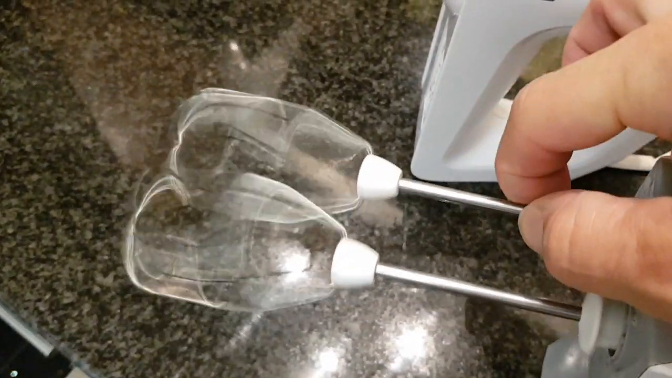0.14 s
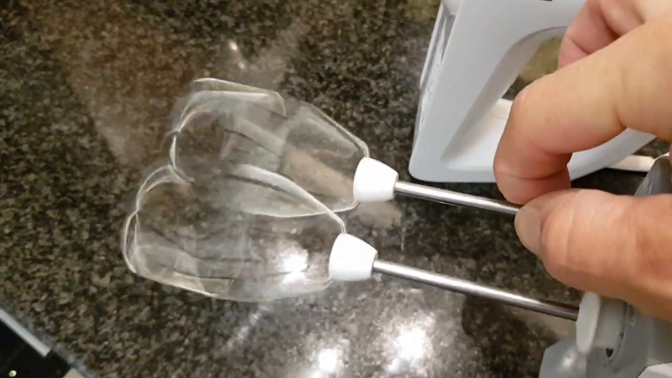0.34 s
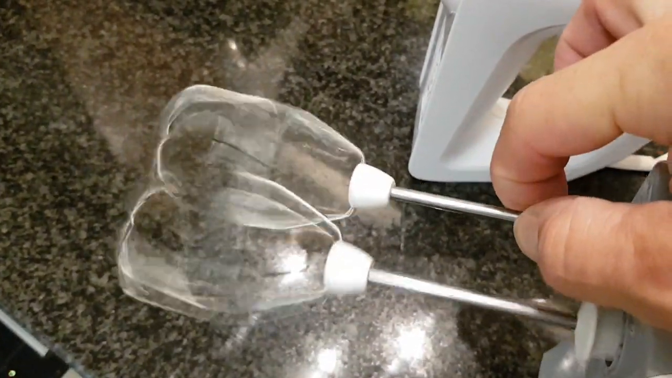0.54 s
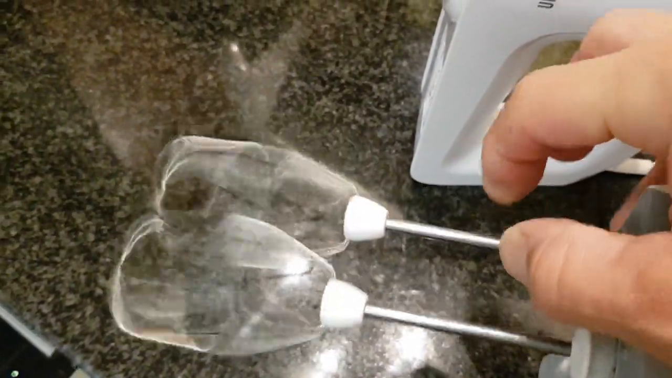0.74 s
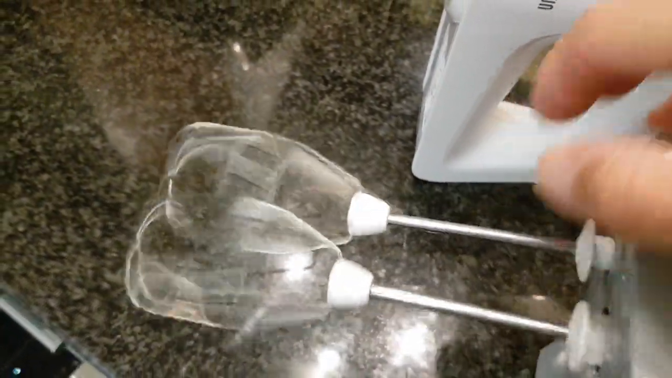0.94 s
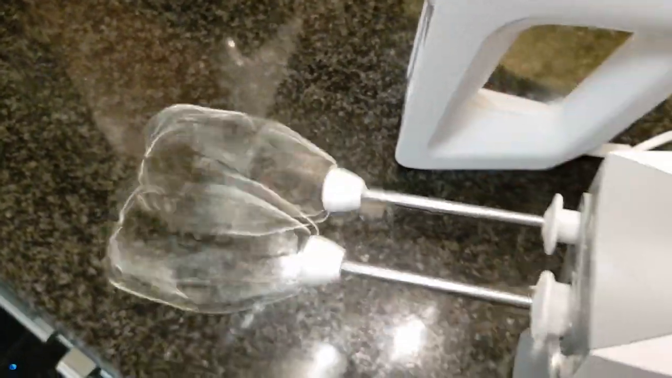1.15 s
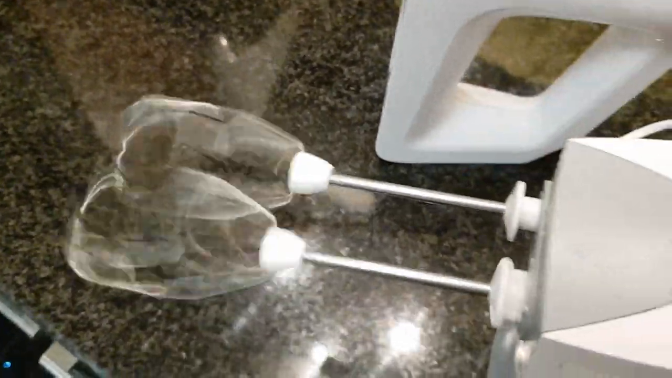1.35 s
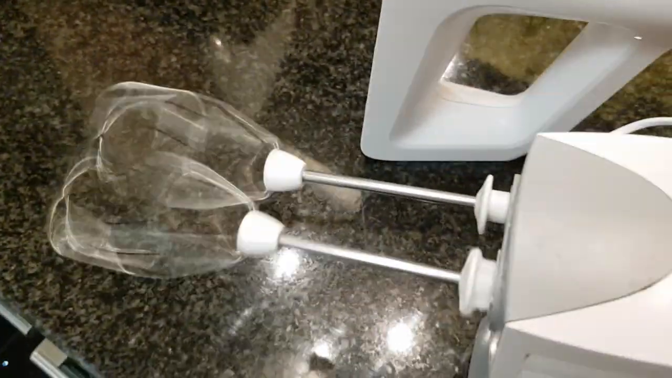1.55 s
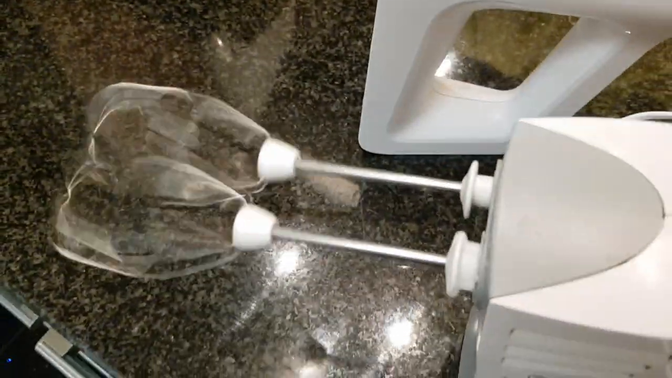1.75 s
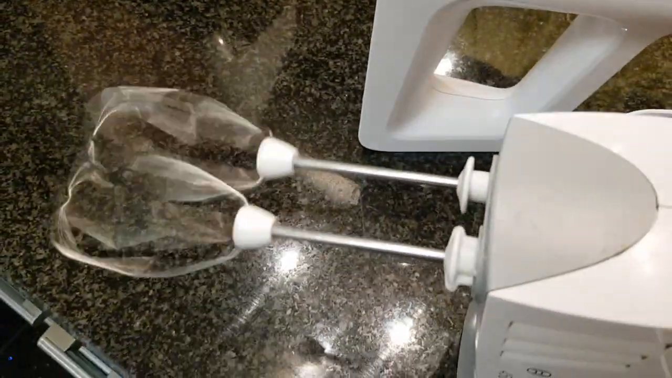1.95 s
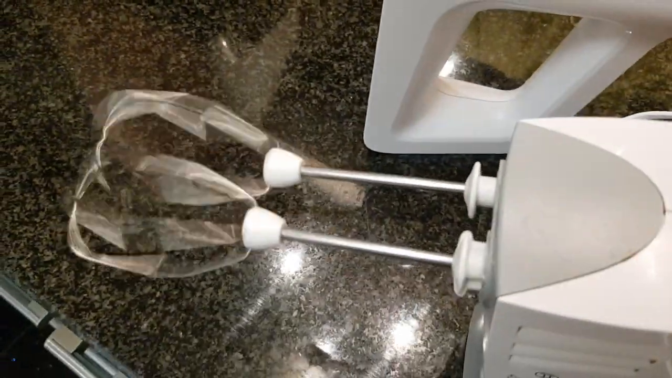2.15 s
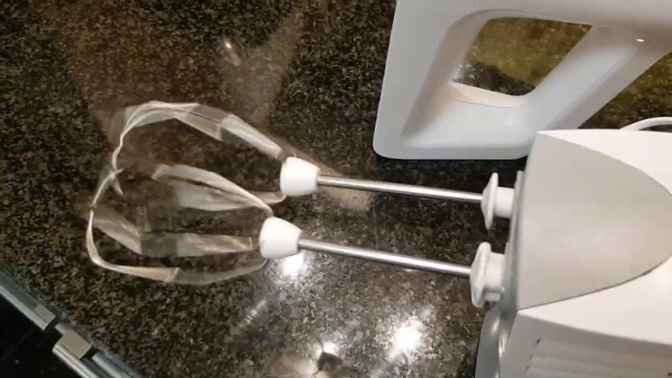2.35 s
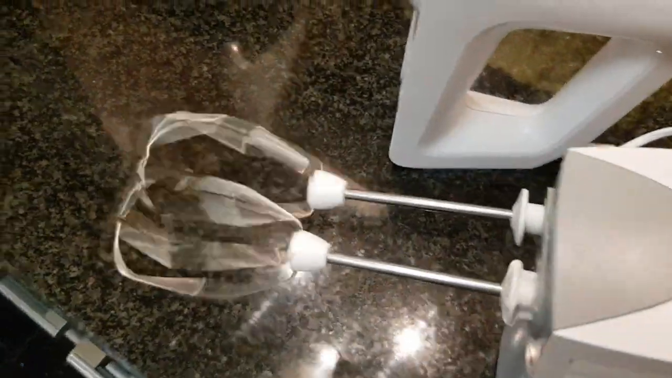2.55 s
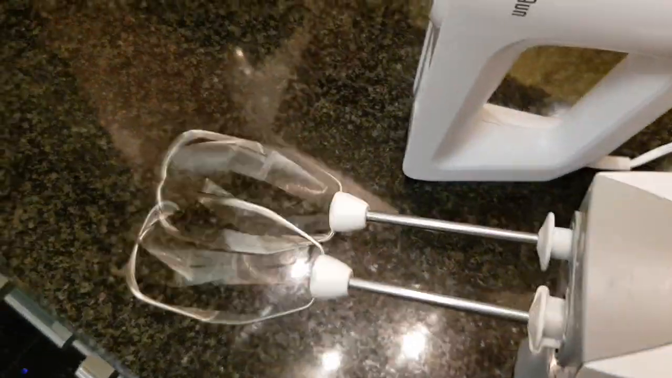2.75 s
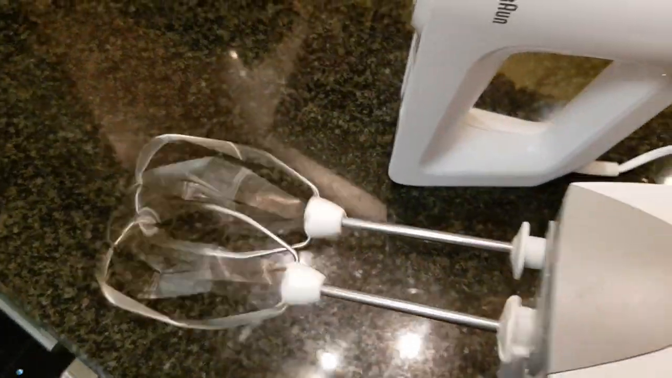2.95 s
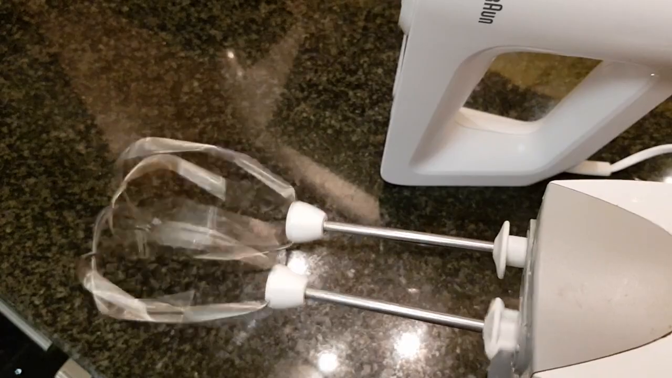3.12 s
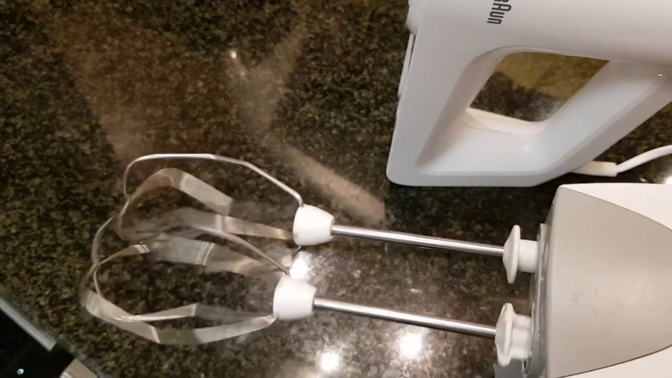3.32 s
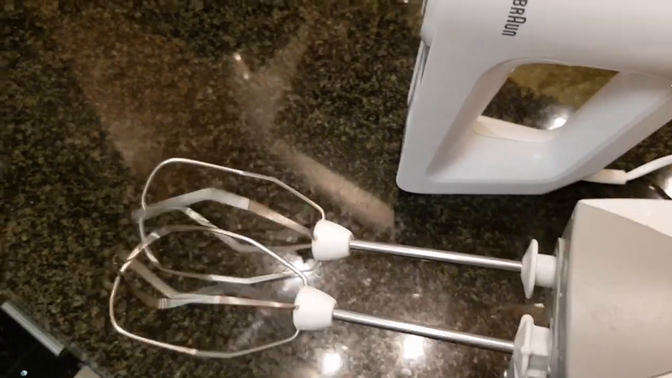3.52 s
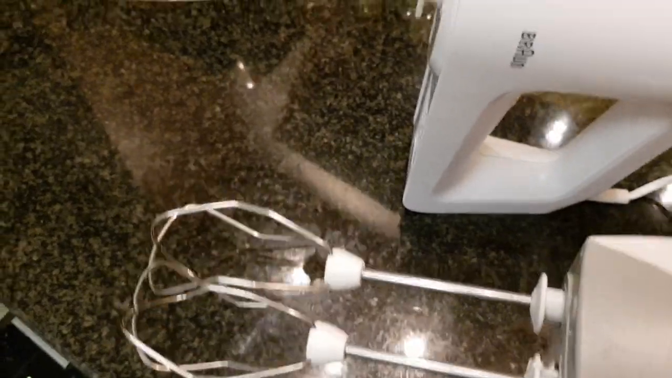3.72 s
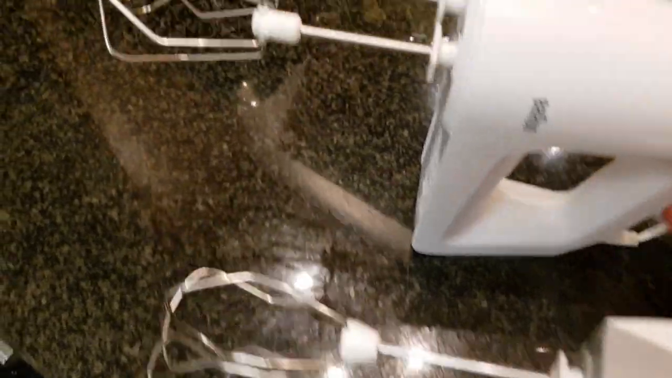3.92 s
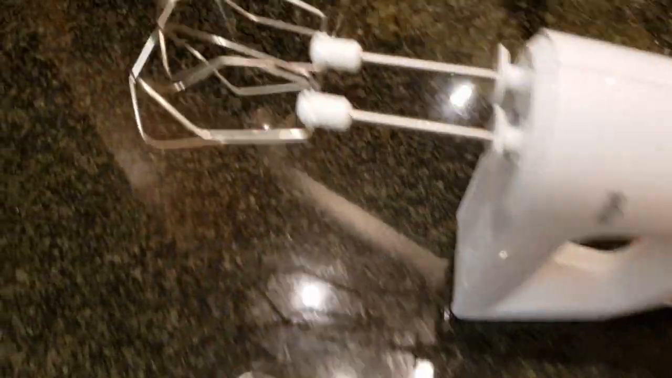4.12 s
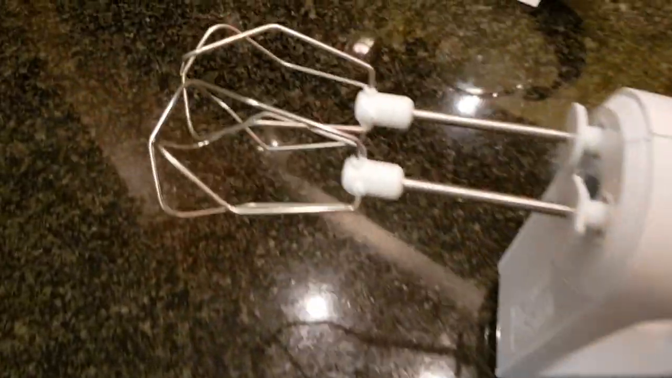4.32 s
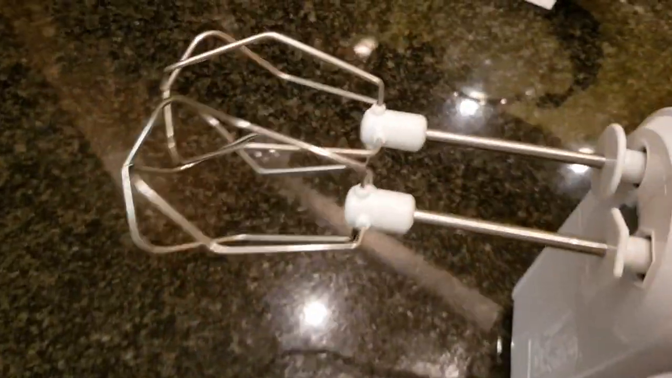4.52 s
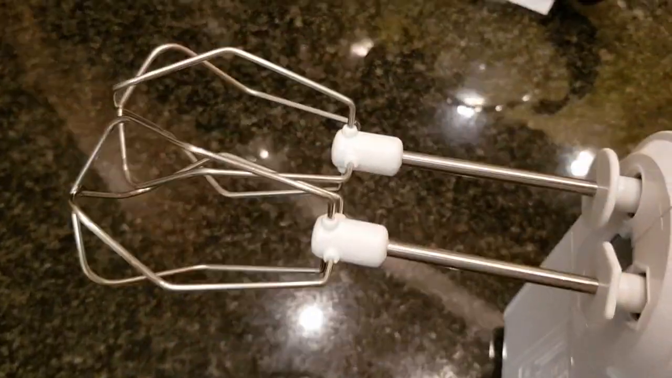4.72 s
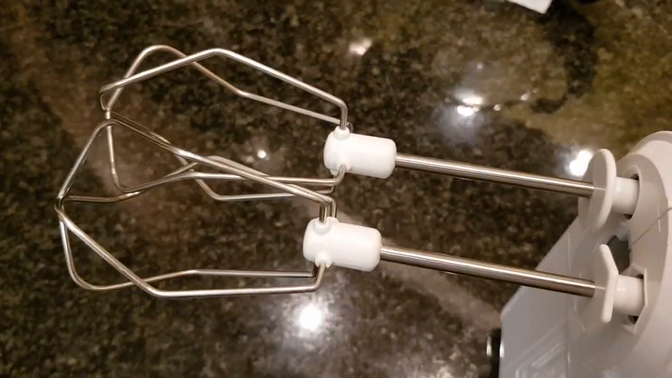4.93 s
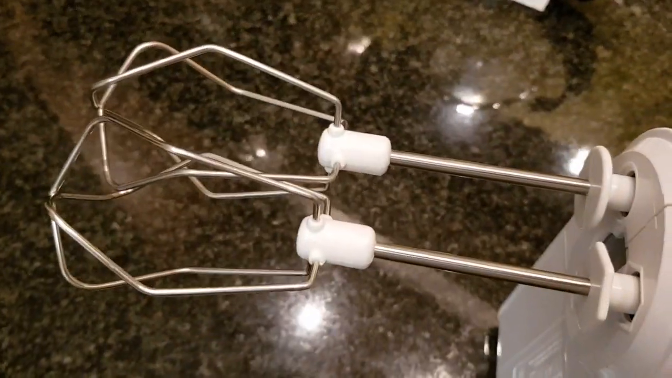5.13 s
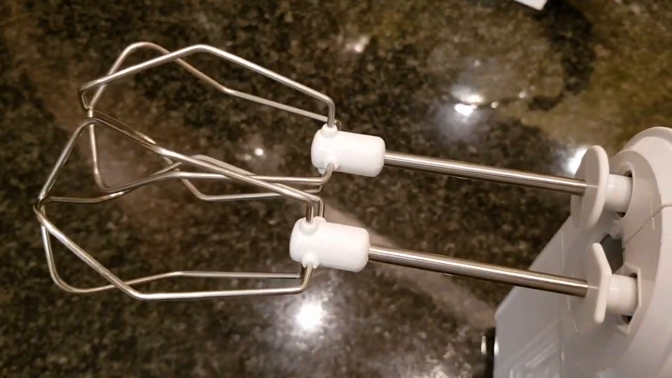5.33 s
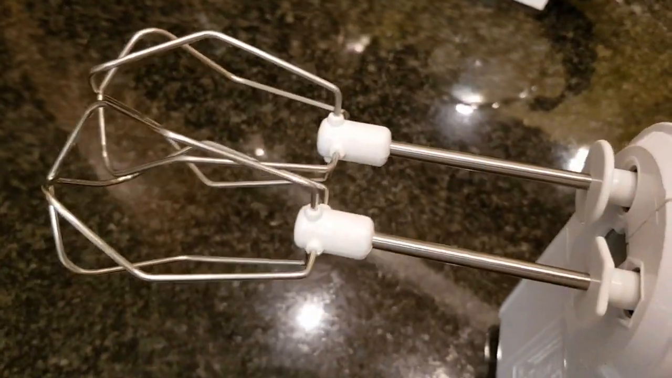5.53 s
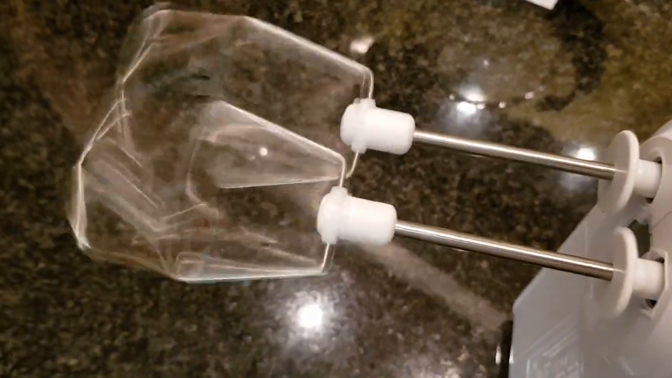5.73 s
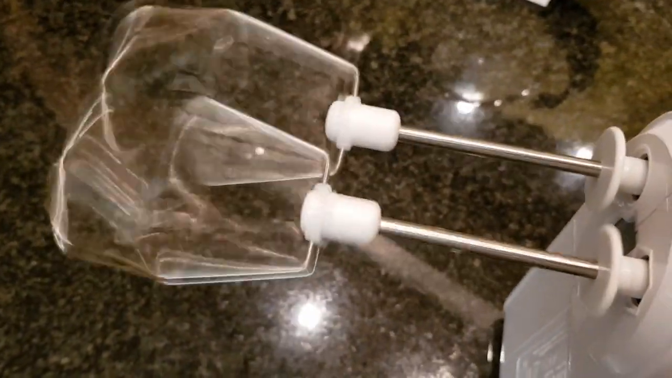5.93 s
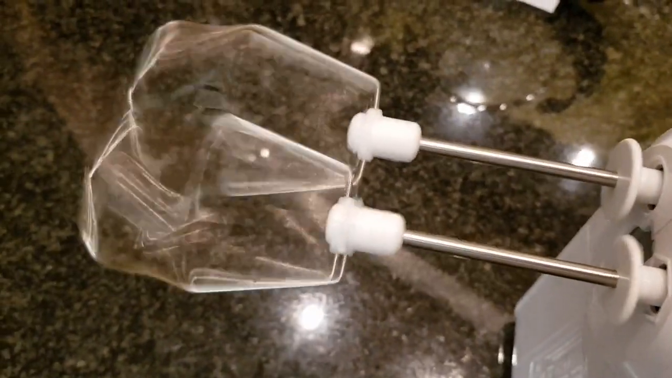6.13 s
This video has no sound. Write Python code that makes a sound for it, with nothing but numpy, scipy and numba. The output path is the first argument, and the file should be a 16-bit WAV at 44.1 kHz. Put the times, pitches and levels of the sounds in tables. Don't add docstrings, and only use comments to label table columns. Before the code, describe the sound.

Stereo close microphone, sources leaning right, short hard kitchen reverberation over faint low rumble and fridge hum. A small motor whirs smoothly at high speed, falls to a slower, duller purr after a hard click, then clicks off and coasts to silence. Its housing is slid aside with thumps and rubs; small handling knocks lead to a sudden, bright, rattling motor that keeps running.

```python
import sys
import numpy as np
from scipy import signal
from scipy.fft import rfft, irfft, next_fast_len
from scipy.io import wavfile
from scipy.ndimage import uniform_filter1d
from numba import njit

SR = 44100
rng = np.random.default_rng(int(sys.argv[2]) if len(sys.argv) > 2 else 0)


def bounce(signal):
    frames = np.transpose(np.atleast_2d(signal))
    limited = np.clip(frames, -1, 1)
    pcm = np.round(limited * 32767).astype(np.int16)
    wavfile.write(sys.argv[1], SR, pcm)


def elevation(decibels):
    levels = np.asarray(decibels, float)
    return 10 ** (levels / 20)


N = 276507
T = np.arange(N) / SR

# f/Hz, level/dB
KITCHEN = [(18, -50.5), (30, -18), (50, -8), (95, -0.5), (153, -17.5), (246, 0), (304, -1.5), (396, 0.5),
           (572, -13.5), (670, -9.5), (995, -19.5), (1290, -23), (6280, -31), (8170, -36), (15000, -26),
           (16200, -29)]
# f/Hz, width/Hz, level/dB
KITCHEN_RINGS = [(272, 25, -7.5), (345, 25, 2.5), (382, 25, 1), (420, 25, 1.5)]
# f/Hz, left minus right/dB
KITCHEN_SIDE = [(60, -3.5), (110, -5), (200, -8.5), (380, -11), (700, -7.5), (1290, 0), (2380, -1),
                (4400, 0.5), (8120, -4), (15000, -2)]
# f/Hz, level/dB
FRIDGE = [(99.8, -77), (147, -83), (200, -80), (294.7, -74.5)]
# f/Hz, level/dB
WALLS = [(20, -10), (300, -4), (1000, -3.5), (3000, -6.5), (6000, -5), (12000, -7.5), (22000, -9)]
# f/Hz, level/dB
LEFT_EAR = [(100, 4), (1000, 2.5), (3000, 3), (6000, 0), (14000, -1.5)]
# f/Hz, width/Hz, level/dB
PORT_NOTCH = [(8060, 780, -6.5), (5460, 590, -3.5), (4820, 310, 0), (6424, 270, -1.5), (8970, 260, -4.5)]

# t/s, length/s, f/Hz, level/dB
SQUEAKS = [(4.245, 0.041, 1420, -82), (4.43, 0.062, 1400, -80.5), (4.455, .04, 2440, -83.5),
           (4.781, 0.064, 2550, -82), (4.86, .07, 1410, -82)]
# t/s, peak level/dB, ring f/Hz, treble level/dB, left minus right/dB
KNOCKS = [(3.311, -38, 600, -57, -1), (3.322, -33, 607, -47, 0), (3.986, -56, 665, -64, -10),
          (4.005, -45.5, 727, -60, -2), (4.079, -56, 690, -71.5, 0), (4.09, -57, 160, -90, -12),
          (4.545, -58, 715, -79, -7.5), (4.55, -63, 470, -85, -8), (4.59, -63, 760, -82.5, -6),
          (4.699, -74, 810, -84, -5.5), (4.788, -81, 587, -84, -10), (5.203, -52, 806, -55.5, -6),
          (5.2095, -43, 820, -66, -5), (5.218, -46, 760, -62, -6), (5.227, -38.5, 786, -52.5, -4.5),
          (5.245, -43, 760, -74, -4), (5.396, -52, 855, -63, -8), (5.4, -62, 2600, -75, -5),
          (5.429, -56.5, 482, -76, -8), (5.593, -54, 724, -70.5, -3), (5.6, -54, 400, -75, -5.5),
          (5.61, -53, 433, -85, -6)]
# t/s, hold/s, tail t60/s, level/dB, left minus right/dB
RUBS = [(3.87, 0.11, 0.33, -56.5, -2.5), (3.997, 0.042, 0.24, -55, -1.5), (4.3, 0.053, .3, -81, -10.5),
        (4.391, 0.045, .2, -77.5, -5), (4.529, .01, .5, -73.5, -7), (4.672, .02, 0.53, -75, -12),
        (4.916, .01, 0.82, -82.5, -3.5), (5.227, 0.0048, .13, -76.5, -10), (5.397, .005, .6, -81.5, -6),
        (5.601, 0.0058, .3, -83, -6)]
# f/Hz, level/dB
SLIDE_COLOUR = [(410, -8), (700, -7), (757, -1), (985, -22), (1480, -16), (2060, -11), (2570, -10),
                (7860, -10), (12300, -11), (16200, -6)]

# t/s, peak level/dB, treble level/dB, left minus right/dB, delay until slider lands/ms
SNAPS = [
    (0.653, -29.5, -33.5, -1, 0.94),
    (1.9015, -13, -23, -6, 0.62),
    (2.4278, -20, -46.5, -2, 1.21),
    (2.698, -27.5, -55, -2, 1.2),
    (3.1792, -10, -23.5, -3, 2.28),
]
# f/Hz, level/dB, t60/s
SWITCH = [(457, -11.5, 0.055), (626, -5, 0.052), (950, -0.5, 0.018), (1154, 6, 0.018), (1480, -1, .01),
          (2200, -3, 0.012), (4470, -10.5, 0.0074)]
# f/Hz, level/dB per Hz
CRACK = [(880, -27), (1500, -17.5), (1940, -8.5), (2330, -6), (3610, -13.5), (4240, -10), (7800, -21.5),
         (9200, -19.5), (12200, -17.5), (15100, -27), (16300, -29)]

# f/Hz, level/dB per Hz
SECOND_LOW = [(24, -63), (40, -26.5), (155, -31), (255, -14.5), (403, -18.5), (502, -10.5), (712, -7),
              (1050, -3.5), (1380, -5), (2220, -2.5), (3200, -22), (4160, -37.5), (7040, -120)]
# f/Hz, level/dB per Hz
SECOND_HIGH = [(1470, -27), (2500, -3.5), (2950, -7), (3950, -4.5), (4670, -6), (5460, -9.5), (6750, -10.5),
               (7950, -12.5), (9370, -11), (12100, -6), (15100, -11), (16200, -40.5)]
# f/Hz, width/Hz, level above the spectrum/dB
SECOND_HOUSING = [(490, 64, 2.5), (1051, 80, 5.5), (1260, 60, 3), (1530, 150, 5), (2056, 110, 6.3),
                  (2320, 180, 6), (3110, 110, 3), (4320, 60, 2), (6660, 130, 3), (12140, 510, 5)]
# running level/dB, surge at start/dB, surge decay/s, lift by a whisk tick
SECOND_LAYERS = [
    (-27, 2.5, 0.077, 0.046),
    (-46, 34, 0.014, .05),
    (-26, 5, 0.2, .4),
    (-28, -0.5, 0.055, 0.92),
]
# t/s, jump as a share of the running noise
SECOND_BUMPS = [(5.6663, 0.61), (5.688, 1.1), (5.701, 1), (5.722, 0.5), (5.746, .4), (5.776, 0.46),
                (5.815, 0.71), (5.851, 0.55), (5.857, 0.55), (5.919, .6), (5.9595, 0.44), (5.967, 0.39),
                (5.9866, 0.67), (5.998, .4), (6.026, .6), (6.044, .4), (6.094, 0.8), (6.1477, .6),
                (6.185, 0.91), (6.218, .4), (6.246, 0.43), (6.261, 0.62)]
# t/s, jump as a share of the running noise
SECOND_RATTLES = [(5.699, .8), (5.713, .6), (5.737, .5), (5.765, .4), (5.815, .9), (5.829, .6), (5.848, .5),
                  (5.858, .5), (5.876, .5), (5.902, 0.37), (5.919, .7), (5.937, .7), (5.966, .6),
                  (5.989, 1.5), (6.026, .6), (6.057, .4), (6.081, .4), (6.099, 1), (6.131, .5), (6.148, 1),
                  (6.183, .4), (6.219, .7), (6.232, 0.89)]
# t/s, peak level/dB, left minus right/dB
TICKS = [(5.6668, -21.5, -6.5), (5.6743, -24, -9), (5.7127, -20.5, -6), (5.7347, -16.5, -10),
         (5.815, -19, -6.5), (5.8749, -17, -2.5), (5.9208, -22, -5), (6.042, -19.5, -8.5),
         (6.0649, -17, -9.5), (6.2186, -18, -6.5)]
# t/s, peak level/dB, f/Hz, t60/s
JOLT = [(5.69, -49, 100.5, 0.23), (5.672, -45.5, 190, 0.31)]
# multiple of mesh rate, running level/dB, surge at start/dB
MESH = [(1, -44, 8), (2, -36.5, 7), (3, -52, 22), (4, -53, 26)]

# t/s, shaft rate f/Hz
SHAFT = [(0, 159.7), (.62, 159.8), (.72, 163.6), (.9, 164.15), (1.76, 164.2), (1.83, 156), (1.95, 140),
         (2.2, 100), (2.42, 70), (2.55, 72.2), (2.8, 72.45), (3.17, 72.55), (3.2, 70), (3.5, 35), (3.85, 5)]
# from t/s, to t/s
POWERED = [
    (-2, 1.8),
    (2.5, 3.18),
]
# t/s, nearness/dB, vents turned to the phone/dB, left minus right/dB
HELD = [(0, -0.5, 2, -3), (.47, -1.6, 4.5, -2.5), (.67, -1.2, -0.3, -2), (.95, -0.1, -3, -2.5),
        (1.38, -0.33, -0.4, -3), (1.79, 0.6, -0.6, -2.5), (2.1, -1.7, 2.5, -3.5), (2.33, -2, 1, -4),
        (2.5, 2.5, -3, -5), (2.75, 1.5, -0.4, -4), (3.12, 2.4, -2, -4), (3.3, 0.5, -1, -5.5),
        (3.52, 5, -5, -5.5), (3.65, -2.5, -3, -6.5), (3.85, -16.5, -9.5, -10)]
# level at full speed/dB, power of speed, loss when coasting/dB, share of vent turn
FIRST_LAYERS = [
    (-28, 1.95, 0, 0.11),
    (-39.5, 1.65, 0, 0.034),
    (-39.5, 2.66, 0, .3),
    (-38.5, 1.6, -.5, 0.89),
]
# f/Hz, level/dB per Hz
FIRST_LOW = [(24, -64), (40, -29), (161, -23), (246, -20.5), (318, -18), (540, -17), (920, 2.5), (1260, -2),
             (1720, -4.5), (1920, 1.5), (2200, -2.5), (3200, -8), (4160, -62), (7040, -120)]
# f/Hz, level/dB per Hz
FIRST_HIGH = [(1470, -28), (2500, -13.5), (2860, -14), (3470, -8), (4460, -9.5), (5300, -8.5), (6800, -14),
              (8080, -18.5), (10700, -18), (11800, -10.5), (13800, -10.5), (15700, -13), (16200, -32)]
# f/Hz, width/Hz, level above the spectrum/dB
FIRST_HOUSING = [(138.4, 24, 3.9), (215, 20, 1), (633, 49, 4.5), (836, 87, 2.2), (955, 170, 2),
                 (1073, 60, 3.2), (1400, 90, 3.5), (1470, 100, 4), (1650, 130, 1.2), (1921, 90, 5.1),
                 (2560, 250, 1.8), (4530, 270, 4.9), (12100, 170, 2), (13400, 400, 0.92)]
# f/Hz, width/Hz, level/dB
VENT_DIPS = [(2814, 210, -5), (4900, 400, -4.5), (5480, 270, -3), (6650, 200, -2), (7650, 420, -5),
             (8350, 150, -4)]
# t/s, jump as a share of the running noise
FIRST_BUMPS = [(.295, 0.69), (.395, 0.38), (.487, 0.63), (.522, 0.91), (0.601, 0.85), (.713, 0.85),
               (.73, 0.62), (.95, 0.99), (1.335, 0.18), (1.45, .5), (1.47, 0.72), (1.575, 0.79),
               (1.6, 0.69), (1.763, 0.33), (2.427, 1.2), (2.44, 2.2), (2.455, 1.6), (2.468, 1.7),
               (2.597, 1.1), (2.631, 0.54), (2.698, 1.1), (2.712, 0.87), (2.838, .9), (2.9, 1.2),
               (3.139, 0.9), (3.205, 1), (3.23, 0.7), (3.448, 1.4), (3.485, 0.69), (3.56, .9), (3.647, 1)]
# multiple of shaft rate, level over rumble/dB
UNBALANCE = [(1, -9.5), (2, -10), (3, -24.5), (4, -18.5)]
# t/s, length/s, f/Hz, level/dB
SHUDDERS = [(1.988, 0.089, 135, -49.5), (2.2, .07, 100, -62), (2.365, 0.12, 135, -53),
            (2.48, .08, 100, -58), (3.23, 0.076, 100, -54), (3.36, .09, 100, -64.5), (3.53, 0.22, 138, -64)]
# multiple of bar rate, level/dB
WHINE_FAST = [(1, -45), (2, -58), (4, -66), (5, -70), (6, -60), (7, -61), (8, -60)]
# multiple of bar rate, level/dB
WHINE_SLOW = [(1, -58), (4, -64), (5, -67), (6, -76), (7, -64), (8, -76), (12, -67), (14, -71), (15, -73)]
# multiple of bar rate, level at full speed/dB
WHINE_COASTING = [(3, -58), (4, -56), (5, -52), (6, -57)]
# f/Hz, level/dB
MAINS = [(100, -7.5), (200, -5.5), (300, -3), (400, -4.5), (500, 1), (600, 1)]

BARS, BLADES = 12, 10
FAST_HZ, SLOW_HZ = 164.2, 72.6
START_S, SETTLE_S = 5.656, 0.028


def colour(x, points, peaks=()):
    size = next_fast_len(x.shape[-1])
    f = np.maximum(np.arange(size // 2 + 1) * SR / size, 1)
    hz, db = np.transpose(points)
    db = np.interp(np.log(f), np.log(hz), db, left=-70, right=-70)
    db = db + sum(g / (1 + (2 * (f - c) / w) ** 2) for c, w, g in peaks)
    return irfft(rfft(x, size) * elevation(db), size)[..., :x.shape[-1]]


def butter(order, hz, kind):
    return signal.butter(order, hz, kind, fs=SR, output="sos")


def band(x, lo_hz, hi_hz):
    y = signal.sosfilt(butter(4, [lo_hz, min(hi_hz, 20000)], "band"), x)
    return y / np.std(y)


def walk(rate):
    k = int(SR / rate)
    steps = np.repeat(rng.standard_normal(N // k + 1), k)[:N]
    y = uniform_filter1d(steps, k)
    return y / np.std(y)


def curves(table):
    s, *columns = np.transpose(table)
    return [np.interp(T, s, c) for c in columns], (T >= s[0]) & (T <= s[-1] + .01)


def sides(pan_db):
    return elevation(np.array([[.5], [-.5]]) * pan_db)


def add(out, s, sound, db, pan_db):
    i = int(s * SR)
    out[:, i:i + sound.shape[-1]] += sound / np.max(np.abs(sound)) * elevation(db) * sides(pan_db)


def ring(hz, t60, rise=0.00042, count=6000):
    t = np.arange(count) / SR
    return np.sin(2 * np.pi * hz * t) * 1000. ** (-t / t60) * (1 - np.exp(-t / rise))


def swell(s, length):
    return np.exp(-(2 * (T - s) / length) ** 2)


def clatter(rate, scatter_db, hiss, apart=0.):
    force = elevation(scatter_db * np.minimum(rng.exponential(size=N), 3.5))
    hits = (rng.random(N) < rate / SR) * force * rng.choice([-1, 1], N)
    common = hits / np.std(hits) + hiss * rng.standard_normal(N)
    return common + apart * rng.standard_normal((2, N))


def lurch(rate, depth, decay, clear):
    at = np.cumsum(SR / rate * rng.uniform(0.65, 1.5, size=400)).astype(int)
    bumps = np.zeros(N)
    bumps[at[at < N]] = depth * rng.uniform(0.15, 1, size=400)[at < N]
    s, jump = np.transpose(clear)
    bumps[(s * SR).astype(int)] = np.clip(jump, 0, 4)
    return 20 * np.log10(1 + signal.lfilter([1], [1, -np.exp(-1 / (decay * SR))], bumps))


def kitchen():
    mid, side = colour(rng.standard_normal((2, N)), KITCHEN, KITCHEN_RINGS)
    side = colour(side, [(1, -6), (150, -6), (500, -2), (1200, 0), (SR, 0)])
    air = (mid + side * np.array([[1], [-1]])) * elevation(.8 * walk(5.3))
    air = air / np.std(air)
    ports = []
    for port, way in zip(air, (.5, -.5)):
        tilt = [(f, way * db) for f, db in KITCHEN_SIDE]
        ports.append(colour(port, [(0.98, 0.00066)] + tilt + [(SR, 0)]))
    hum = sum(elevation(db + 0.5 + 1.7 * walk(4.8)) * np.sin(2 * np.pi * f * T) for f, db in FRIDGE)
    return np.array(ports) * elevation(-66.5) + hum


def walls(x, t60):
    t = np.arange(int(.5 * SR)) / SR
    tail = rng.standard_normal((2, len(t))) * 1000. ** (-t / t60) * (t > .002)
    tail /= np.sqrt(np.sum(tail ** 2, axis=1, keepdims=True))
    return signal.fftconvolve(x, colour(tail, WALLS), axes=1)[:, :N]


def squeaks():
    waver = np.cumsum(1 + .06 * walk(220)) / SR
    chirps = sum(elevation(db + 5.0) * swell(s, length) * np.sin(2 * np.pi * hz * waver)
                 for s, length, hz, db in SQUEAKS)
    return chirps * sides(-7)


def knocks():
    out = np.zeros((2, N))
    fade = np.arange(8000) / SR
    # lo/Hz, hi/Hz, gain, t60/s
    scuff_bands = [(635, 1380, 3.1, 0.15), (1507, 2530, 2.3, 0.063), (2770, 3800, 0.52, 0.045)]
    for s, db, hz, treble_db, pan_db in KNOCKS:
        scuff = 0
        for lo, hi, gain, t60 in scuff_bands:
            grit = rng.standard_normal(8000) + rng.standard_normal((2, 8000))
            scuff = scuff + signal.sosfilt(butter(2, [lo, hi], "band"), grit) * gain * 1000. ** (-fade / t60)
        thump = ring(hz, 0.036, rise=0.0047) + 0.46 * ring(0.894 * hz, 0.036, rise=0.0028)
        add(out, s, thump, db - 2.0, pan_db)
        add(out, s, scuff * (1 - np.exp(-fade / 0.00052)), treble_db + 11.0, pan_db)
    return out


def rubs():
    rub = band(colour(clatter(4000, 1.34, .4, apart=1.9), SLIDE_COLOUR), 1050, 14700)
    press = 0
    for s, hold, t60, db, pan_db in RUBS:
        rise_db = 450 * np.clip(s - T, 0, 1)
        fall_db = 60 / t60 * np.clip(T - s - hold, 0, 2)
        press = press + elevation(db - rise_db - fall_db) * sides(pan_db)
    return rub * press * elevation(1.2 * walk(39))


def switch():
    out = np.zeros((2, N))
    fade = np.arange(6000) / SR
    for s, db, snap_db, pan_db, land_ms in SNAPS:
        thud = sum(elevation(g + 1.8 * rng.standard_normal()) * (-1) ** k * ring(f, t60)
                   for k, (f, g, t60) in enumerate(SWITCH))
        crack_fade = 1000. ** (-fade / .014) + .14 * 1000. ** (-fade / .12)
        crack = colour(rng.standard_normal((2, 6000)), CRACK) * crack_fade
        land_s = s + land_ms / 1000
        add(out, s, thud, db - 10.5, pan_db)
        add(out, s, crack, snap_db + 14.5, pan_db)
        add(out, land_s, thud, db, pan_db)
        add(out, land_s, crack[::-1], snap_db + 4.0, pan_db)
    return signal.sosfilt(butter(2, 220, "high"), out)


def mixer(levels_db, low, high, housing, teeth, fizz, throb_db, vent_throb_db, dull=0., dips=()):
    gear_db, rumble_db, air_db, brush_db = levels_db
    resonances = housing + list(dips)
    body = colour(teeth, low, resonances)
    vents = colour(fizz, high, resonances)
    rumble = elevation(rumble_db) * band(body, 33, 554)
    gears = band(body, 470, 2934)
    gears = gears - dull * signal.sosfiltfilt(butter(2, 810, "high"), gears)
    gears = elevation(gear_db + throb_db + 0.36 * walk(30)) * gears
    air = elevation(air_db + vent_throb_db + 0.36 * walk(25)) * band(vents, 2750, 7960)
    brushes = elevation(brush_db + 0.88 * vent_throb_db + 0.86 * walk(25)) * band(vents, 6800, 16300)
    return rumble + gears + air + brushes


def second_controls():
    t = np.clip(T - START_S, 0, None)
    spin_up = np.clip(t / 0.011, .003, 1) ** 2
    rise_db = 20 * np.log10(spin_up * (1 - 0.5 * np.exp(-t / SETTLE_S)))
    shake = sum(elevation(db + 15.5) * (T > s) * np.exp(-np.clip(T - s, 0, None) / 0.014) for s, db, _ in TICKS)
    return [db + rise_db + surge * np.exp(-t / tau) + 20 * np.log10(1 + np.clip(lift, 0, 3) * shake)
            for db, surge, tau, lift in SECOND_LAYERS]


def mesh():
    t = np.clip(T - START_S, 0, None)
    mesh_hz = 1135 - 190 * np.exp(-t / .11)
    turns = np.cumsum(mesh_hz * (1 + .009 * walk(60))) / SR
    pull = np.exp(-(t / 0.14) ** 2)
    tones = sum(elevation(db + 3.5 + surge * pull + 2.66 * walk(90)) * np.sin(2 * np.pi * k * turns)
                for k, db, surge in MESH)
    return (1 - np.exp(-t / SETTLE_S)) * tones


def second_mixer():
    rattle = clatter(3000, 1.3, 0.48, apart=0.76)
    fizz = 0.76 * rattle + 0.83 * rng.standard_normal((2, N))
    beat_db = 1.1 * np.cos(2 * np.pi * 38 * (T - 6.099))
    throb_db = beat_db + lurch(70, .3, 0.0047, SECOND_BUMPS) - 0.96
    vent_throb_db = beat_db + lurch(90, .45, .0035, SECOND_RATTLES) - 1.34
    noise = mixer(second_controls(), SECOND_LOW, SECOND_HIGH, SECOND_HOUSING, rattle, fizz,
                  throb_db, vent_throb_db)
    out = (noise * (T > START_S) + mesh() * elevation(2 * beat_db)) * sides(-4.5)
    for s, db, pan_db in TICKS:
        tick = np.diff(rng.standard_normal(402), n=2) * np.exp(-np.arange(400) / SR / .0015)
        add(out, s, tick, db + 7.0, pan_db)
    for s, db, hz, t60 in JOLT:
        add(out, s, ring(hz, t60, rise=0.016, count=12000), db, 0)
    return out


@njit
def orders(turns, hz, size, start):
    y = np.zeros(len(turns))
    for i in range(len(turns)):
        step, z = np.exp(2j * np.pi * turns[i]), 1. + 0j
        for k in range(min(len(size), int(17000 / hz[i]))):
            z *= step
            y[i] += size[k] * (z * start[k]).imag
    return y


def tone(turns, k, db, rate):
    return elevation(db + 1.8 * walk(rate)) * np.sin(2 * np.pi * k * turns)


def brush_fizz(turns, hz, on, repeat):
    count = 240
    start = np.exp(2j * np.pi * rng.random(count))
    size = rng.rayleigh(.7, count) * np.where(np.arange(count) < 46, .45, 1)
    end = int(on.sum())
    lines = np.pad(orders(turns[:end], hz[:end], size, start), (0, N - end))
    marks = np.sqrt(4 * hz / SR) * lines
    share = np.clip(repeat, 0, 1)
    chance = .2 * rng.standard_normal(N) + .97 * rng.standard_normal((2, N))
    return np.sqrt(share) * np.array([np.roll(marks, 97), marks]) + np.sqrt(1 - share) * chance


def brush_scrape():
    from_s, to_s = 3.6, 3.61
    fade_db = (150 * np.clip(from_s - T, 0, 1) + 110 * np.clip(T - to_s, 0, 1)
               + 15 * np.clip(T - from_s, 0, 1))
    return band(rng.standard_normal((2, N)), 6300, 7700) * elevation(-71.5 - fade_db)


def unbalance(turns, hz, coast, rumble):
    shell_hz, shell_width_hz = 138, 16
    shake = 0
    for k, db in UNBALANCE:
        f = k * hz
        near = 1 / (1 + (2 * (f - shell_hz) / shell_width_hz) ** 2)
        shell_db = (5 + coast) * near - 10.5 * coast + 17 * np.log2(np.clip(f / shell_hz, .01, 1))
        shake = shake + tone(turns, k, db + shell_db + 2.0 * walk(30), 6.7)
    shudder = sum(elevation(db + 0.5) * swell(s, length) * np.sin(2 * np.pi * f * T)
                  for s, length, f, db in SHUDDERS)
    return rumble * shake + shudder


def commutator_whine(turns, fast_db, slow_db, coast_db):
    fast = sum(tone(turns, BARS * k, db + fast_db, 5.4) for k, db in WHINE_FAST)
    slow = sum(tone(turns, BARS * k, db + slow_db + 2.2 * walk(14), 6.2) for k, db in WHINE_SLOW)
    coasting = sum(tone(turns, BARS * k, db + coast_db, 15) for k, db in WHINE_COASTING)
    return fast + slow + coasting


def mains_buzz(mains_db):
    return elevation(mains_db) * sum(elevation(db + 2.5 * walk(10)) * np.sin(2 * np.pi * f * T) for f, db in MAINS)


def first_controls():
    (hz,), on = curves(SHAFT)
    (near_db, vent_db, pan_db), _ = curves(HELD)
    settle_s = 0.055
    current = sum(np.clip(np.minimum(T - a, b - T) / settle_s + .5, 0, 1) for a, b in POWERED)
    coast = 1 - np.clip(current, 0, 1)
    brake = np.exp(-np.clip(T - .63, 0, None) / 0.074)
    speed_db = 20 * np.log10(hz / FAST_HZ)
    levels_db = [db + power * speed_db + lost * coast + near_db + share * vent_db
                 for db, power, lost, share in FIRST_LAYERS]
    repeat = .11 + .42 * brake + .45 * coast * np.clip((hz - SLOW_HZ) / 35, 0, 1)
    fast_db = -4 + 4.5 * brake - 9 * coast - .8 * np.clip(108 - hz, 0, None)
    bed_in_db = 7 * np.clip(T - 2.6, 0, 1)
    slow_db = 5 - .47 * np.abs(hz - SLOW_HZ) - 13 * coast - bed_in_db
    blade_db = -34.5 - 33 * brake - .75 * (FAST_HZ - hz)
    mains_db = -57 + 7.0 * brake - 22 * coast
    coast_db = 2.3 * speed_db + 20 * np.log10(coast + 1e-4)
    return hz, on, coast, coast_db, levels_db, pan_db, repeat, fast_db, slow_db, blade_db, mains_db


def first_mixer():
    hz, on, coast, coast_db, levels_db, pan_db, repeat, fast_db, slow_db, blade_db, mains_db = first_controls()
    turns = np.cumsum(hz * (1 + .0004 * walk(15))) / SR
    fizz = brush_fizz(turns, hz, on, repeat)
    teeth = clatter(1800, 1.4, 0.6, apart=0.22) * (1 + 0.077 * np.sin(2 * np.pi * turns))
    throb_db = .5 * walk(12) + lurch(45, 0.36, 0.0053, FIRST_BUMPS) - 1.2
    dull = np.clip(0.81 * (1 - hz / FAST_HZ), 0, 1)
    noise = mixer(levels_db, FIRST_LOW, FIRST_HIGH, FIRST_HOUSING, teeth, fizz,
                  throb_db, .35 * throb_db, dull=dull, dips=VENT_DIPS)
    shake = unbalance(turns, hz, coast, elevation(levels_db[1]) * on)
    whine = commutator_whine(turns, fast_db, slow_db, coast_db)
    blades = tone(turns, BLADES, blade_db, 8.1)
    tones = shake + whine + blades + mains_buzz(mains_db)
    pan = sides(pan_db)
    return (noise * on + brush_scrape()) * pan, tones * on * pan


def late(x, lag):
    return np.array([np.pad(x[0], (lag, 0))[:N], x[1]])


def scene():
    noise, tones = first_mixer()
    others = elevation(-1.0) * second_mixer() + switch() + knocks() + rubs() + squeaks()
    near = elevation(-1.0) * late(noise, 3) + late(others, 6)
    heard = near + walls(near, t60=0.27)
    left = colour(heard[0], [(0.96, 0.018)] + LEFT_EAR + [(SR, -4)])
    return np.array([left, heard[1]]) + tones + kitchen()


def band_limit(x):
    return signal.sosfilt(signal.butter(12, 15790, fs=SR, output="sos"), x)


def record(dry):
    response = [(1, -30), (30, -3), (70, 0), (16000, 0), (16400, -25), (SR, -40)]
    heard = colour(dry, response, PORT_NOTCH)
    return band_limit(heard)


dry = scene()
out = record(dry)
bounce(out)
```